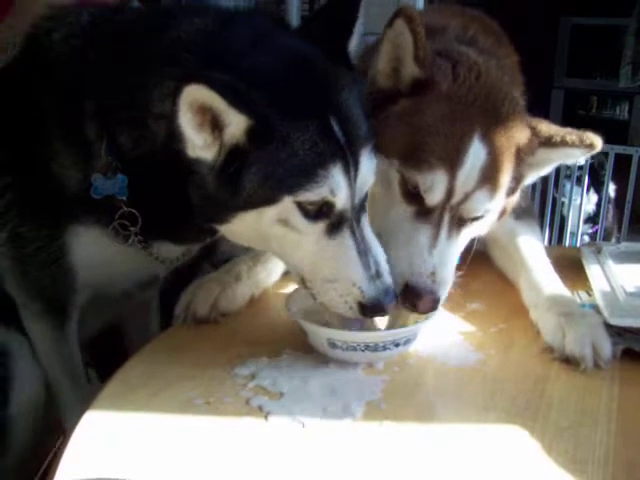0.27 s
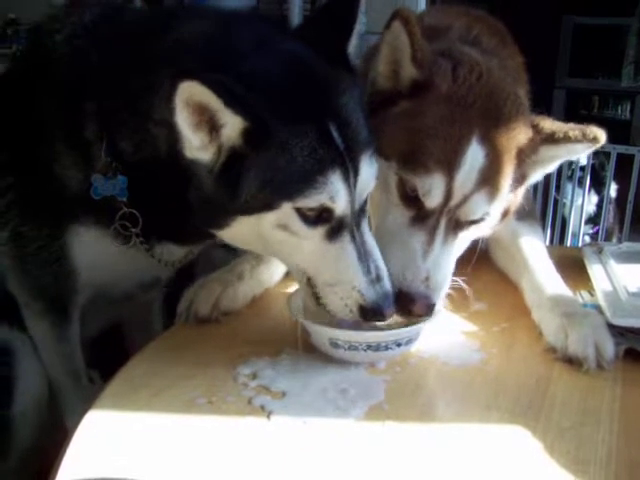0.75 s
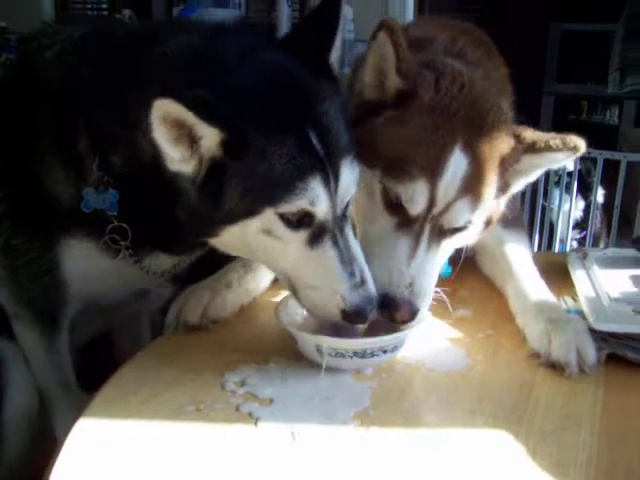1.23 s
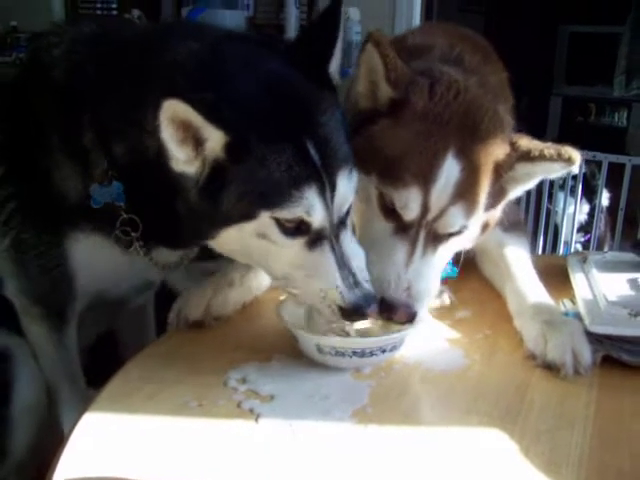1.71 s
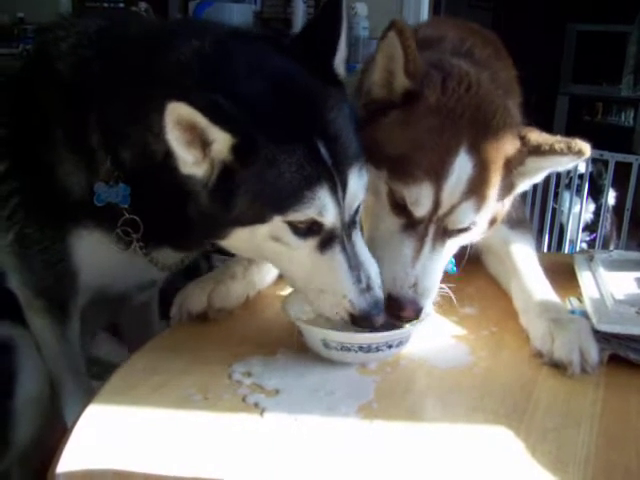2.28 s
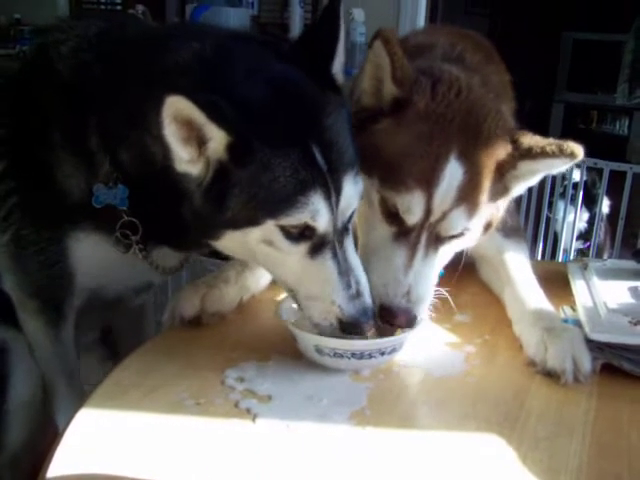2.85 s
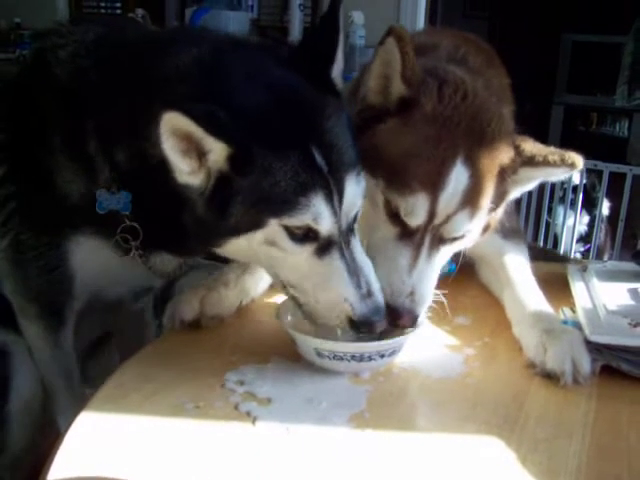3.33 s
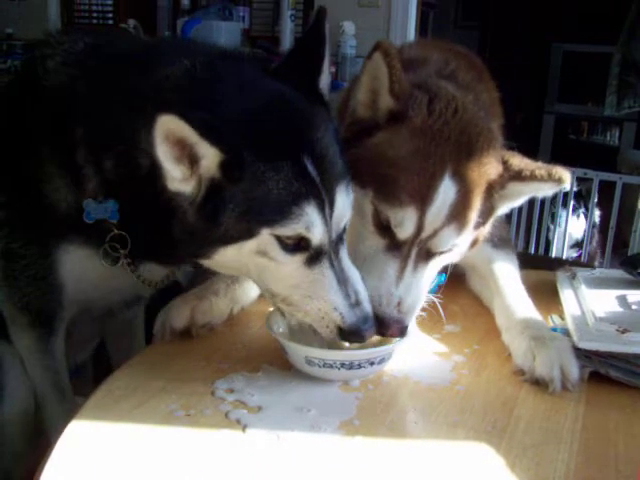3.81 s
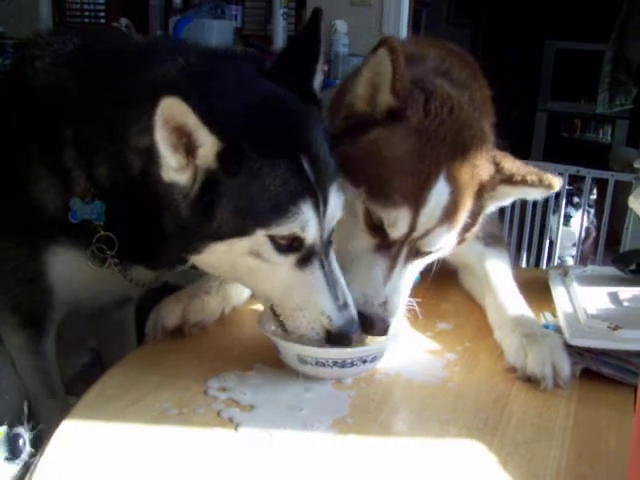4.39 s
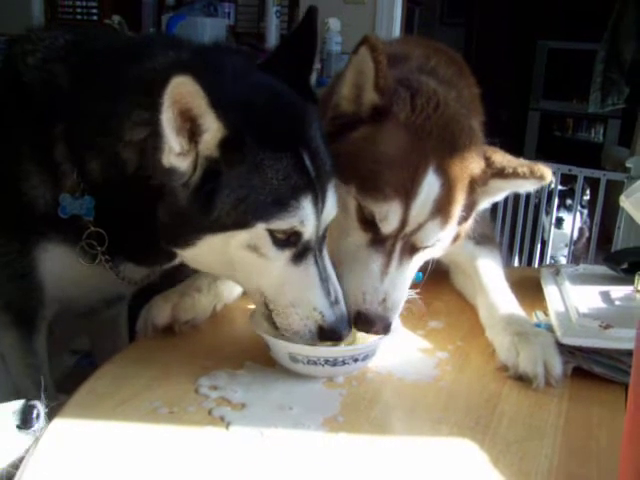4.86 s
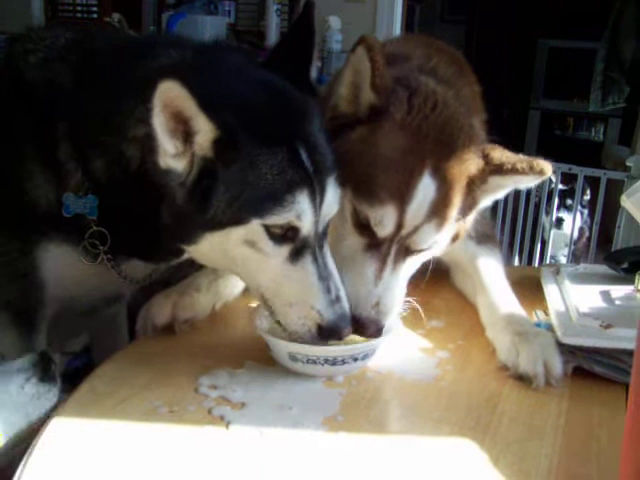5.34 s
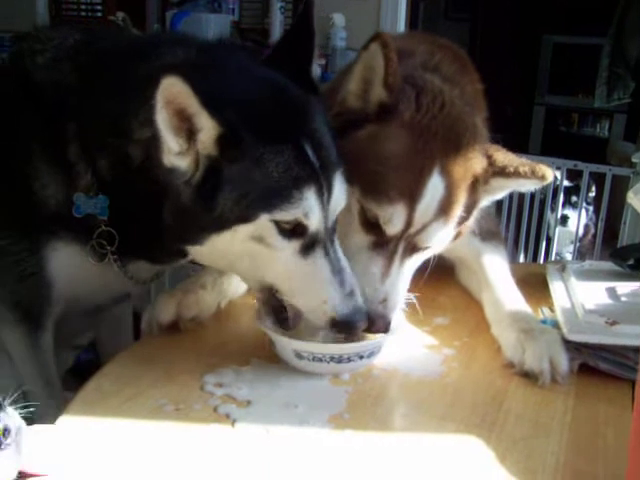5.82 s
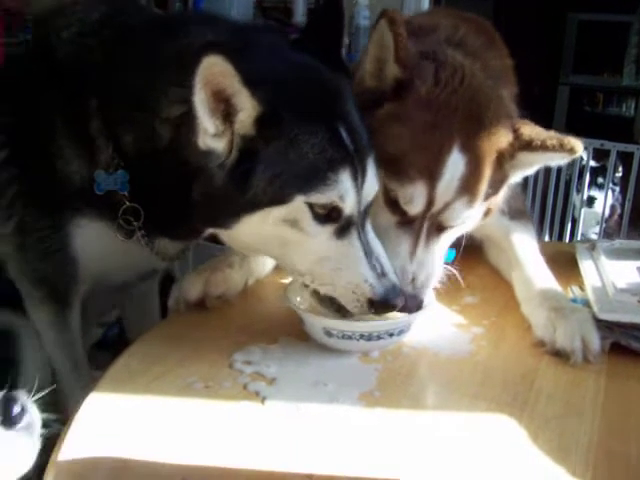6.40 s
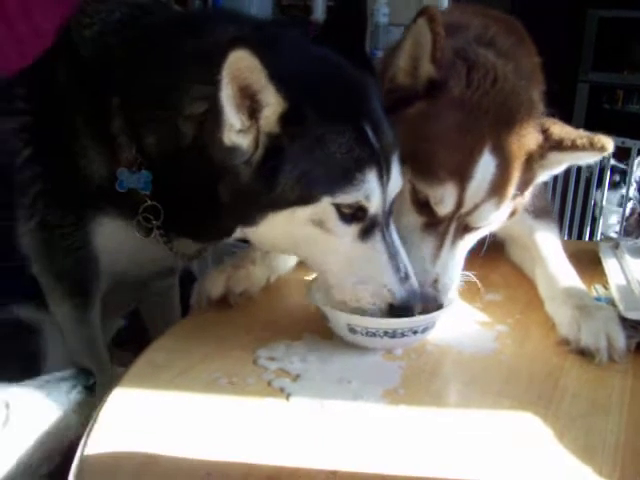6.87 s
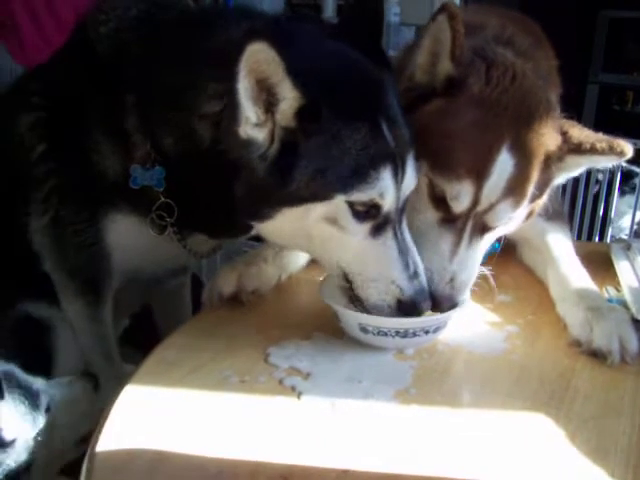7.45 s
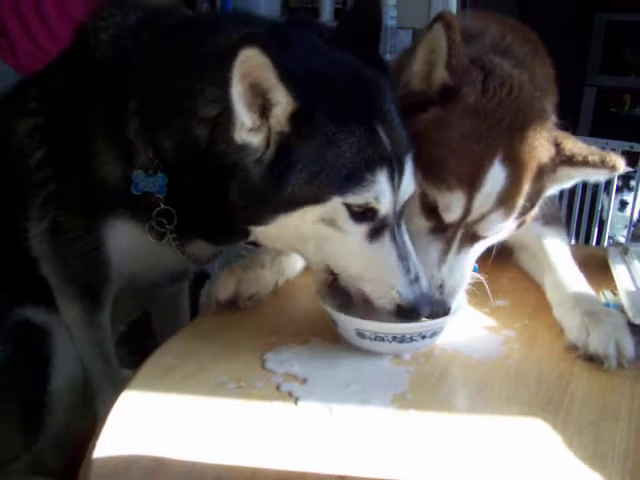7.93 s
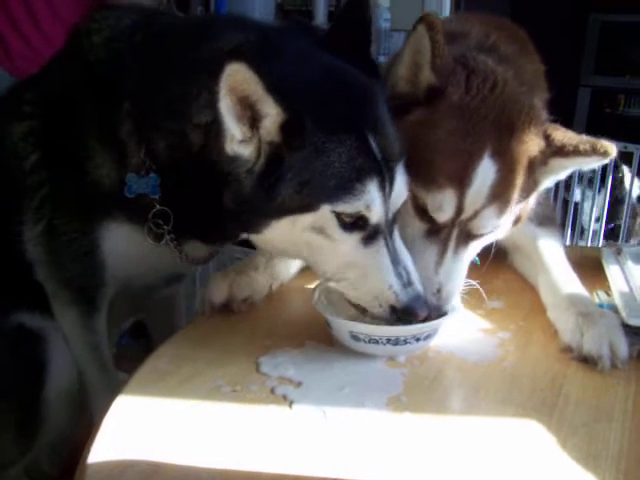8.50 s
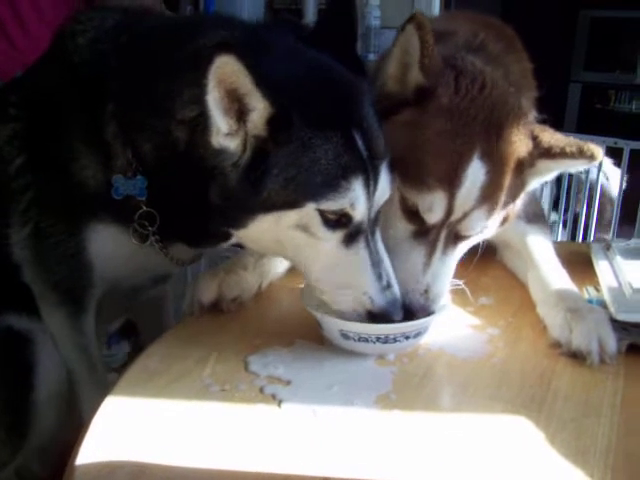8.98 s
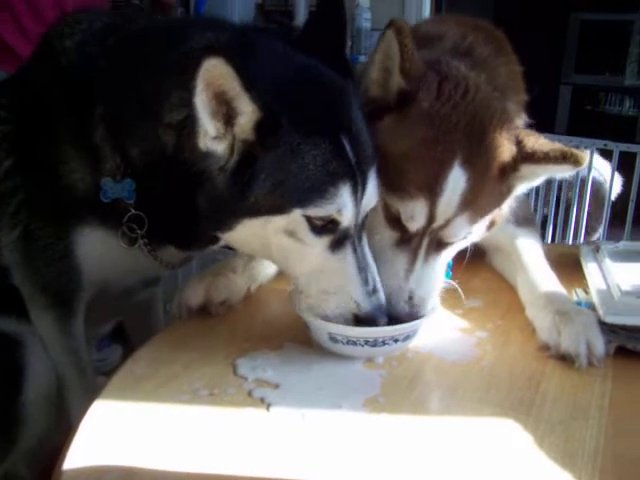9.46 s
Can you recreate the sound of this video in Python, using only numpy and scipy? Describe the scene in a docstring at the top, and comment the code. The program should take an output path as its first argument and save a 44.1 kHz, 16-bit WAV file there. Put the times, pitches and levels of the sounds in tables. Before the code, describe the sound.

Steady, messy lapping already under way and continuing to the end. Overlapping tongues slap liquid, pull it up and peel away with wet clicks, making rounded mid-pitched plops and crisp smacks. Small bubbles chirp upward now and then, low knocks land softly, and one tiny tick touches the bowl after midway. Close, single small microphone in a small room, with faint appliance hum and low background noise beneath.

```python
"""Dogs lapping from a bowl

Two dogs lap from one small bowl on a wooden kitchen table, close to the microphone.
Each lap is a sharp tongue strike and a softer draw after a dip in the idle crackle; licks fall in between.
They drive swarms of tiny ringing cavities: low ones slosh as bubbles, high ones crackle as saliva films.
Single ringing cavities make plops, wet snaps, clear bubbles and dull thuds; one tick rings the bowl.
Decaying noise gives the small room its tail; shaped noise and wavering sines lie underneath as noise and hum."""
import sys
import numpy as np
from scipy import signal
from scipy.fft import rfft, irfft, next_fast_len
from scipy.io import wavfile
from scipy.ndimage import uniform_filter1d

SR = 44100
rng = np.random.default_rng(int(sys.argv[2]) if len(sys.argv) > 2 else 0)


def transcribe(signal):
    """Save signal, clipped to [-1, 1], as a 16-bit WAV file at the path in sys.argv[1]."""
    frames = np.atleast_2d(signal).T
    limited = np.clip(frames, -1, 1)
    pcm = np.round(limited * 32767).astype(np.int16)
    wavfile.write(sys.argv[1], SR, pcm)


N = 428211

# Levels in the event tables are relative; each layer adds its own gain.
# air pockets closing under a tongue: start_s, level_db, pitch_hz
PLOPS = [(0.006, -14.5, 1580.0), (0.116, -12.5, 1130), (0.159, -10.5, 1190), (0.305, -7, 845),
         (0.502, -7, 1070), (0.529, -13, 1250.0), (0.703, -10.5, 1140.0), (1.0045, -2.5, 1260),
         (1.14, -17.5, 1280), (1.367, -12.0, 1300.0), (1.375, -15.5, 1160), (1.412, -10.5, 1080),
         (1.425, -7, 1290), (1.518, -5.0, 877), (1.735, -5.0, 1040), (1.803, -10.5, 850.0),
         (1.843, -9, 1300.0), (2.065, -11, 1310), (2.171, -8.5, 1130), (2.194, -9.5, 1270),
         (2.305, -12, 815), (2.49, -11.5, 1370), (2.556, -9.5, 766), (2.715, -4.5, 1080.0),
         (2.905, -14, 1080), (3.039, -7.5, 1230), (3.134, -10.5, 1300.0), (3.201, -9, 1060),
         (3.5384, -5.5, 1540), (3.579, -11.5, 990), (3.61, -12.5, 1200), (3.656, -13, 1080.0),
         (3.8753, -12.5, 1020), (3.887, -6, 920), (3.96, -10, 1060), (3.984, -13, 1470), (4.025, -11, 1020),
         (4.061, -21, 1300), (4.249, -6.5, 920.0), (4.334, -9, 1270.0), (4.416, -6.5, 980),
         (4.434, -11, 1150), (4.6449, -2.5, 1010), (4.754, -6, 955), (4.807, -9, 1000.0),
         (4.963, -14, 1010), (5.14, -4, 1180), (5.263, -12.5, 890), (5.281, -10.5, 945), (5.313, -10, 960),
         (5.425, -10.5, 840), (5.436, -11, 850), (5.514, -12, 900), (5.664, -12.0, 1010.0),
         (5.684, -5.5, 1240), (5.847, -6.5, 880), (5.864, -10.5, 1130.0), (5.94, -5, 1160),
         (6.081, -8.5, 1000), (6.092, -8.5, 1030.0), (6.155, -15.5, 1480), (6.208, -15.5, 1740),
         (6.427, -5.5, 1030), (6.504, -8, 1350), (6.551, -5, 990), (6.7864, -8, 1060), (6.9199, -2, 1060),
         (6.96, -8, 830), (7.186, -7, 1130), (7.622, -12, 1360), (7.67, -11, 714), (7.8097, -6, 880),
         (7.839, -9, 826), (8.061, -4.5, 1280.0), (8.5204, -5.5, 1070), (8.69, -12.5, 912),
         (8.781, -8.5, 1020.0), (9.013, -13.5, 900), (9.312, -1, 1230), (9.334, -16, 1350),
         (9.462, -8.5, 947)]
# a tongue peeling off the liquid or the palate: start_s, level_db, pitch_hz
SNAPS = [(0.1492, -6.0, 4950), (0.169, -14.5, 3150), (0.523, -8, 5200), (0.71, -12.5, 4200.0),
         (1.012, -11.5, 4230), (1.345, -12.5, 3940), (1.362, -7, 5700), (1.545, -15, 4330),
         (1.616, -10, 3450), (1.635, -13.5, 3460), (1.725, -13, 3620), (1.9095, -13, 3630),
         (2.0857, -10, 4430.0), (2.169, -7.5, 3700), (2.185, -11.5, 4400), (2.559, -6, 4180),
         (3.025, -6, 6030), (3.0468, -12, 4200), (3.133, -17, 3900), (3.219, -10, 3860), (3.4051, -6, 6200),
         (3.445, -15.0, 4250), (3.614, -14.5, 3500.0), (3.872, -10, 6000), (3.882, -11, 3440),
         (3.942, -19, 7200), (4.224, -12.5, 3450), (4.244, -18.5, 5760), (4.346, -15, 4130),
         (4.4, -14, 4500), (4.639, -11.0, 5800.0), (4.756, -10.5, 2850), (4.761, -14, 3000),
         (5.124, -11, 5830), (5.141, -9, 4500.0), (5.318, -10.5, 4000), (5.51, -7.5, 6100),
         (5.691, -15, 4900), (5.775, -24, 5400), (5.816, -9.5, 3040), (5.94, -8, 4780), (6.117, -18, 5900),
         (6.312, -23, 6650), (6.42, -9, 4080), (6.429, -13.0, 4900), (6.784, -10.5, 6130),
         (6.793, -17, 3950), (6.959, -14.5, 4100), (6.976, -12.5, 4100), (7.187, -11, 4370),
         (7.223, -17, 4230), (7.667, -8, 3760), (8.207, -11, 3700.0), (8.513, -9.5, 6400.0)]
# laps, a strike and then a draw: strike_s, draw_delay_s, strike_slosh_db, strike_crackle_db,
# draw_slosh_db, draw_crackle_db, crackle_top_db (upper part of the crackle)
LAPS = [(0.157, 0.22, -29.5, -20, -27.5, -23.5, -12.0), (0.522, 0.097, -41.5, -24, -38, -26, -14),
        (0.693, 0.096, -27, -24.5, -26, -29, -5.5), (0.997, 0.13, -29.5, -24, -25.5, -26.5, -3),
        (1.359, 0.037, -25, -33, -25.5, -19.5, -9), (1.725, 0.12, -26.5, -21.5, -25, -24.5, -8),
        (2.052, 0.12, -24, -21.5, -29, -22, -10.5), (2.557, 0.18, -23, -31, -36, -26, -6),
        (3.026, 0.18, -30.5, -29, -28, -27.5, -9.5), (3.406, 0.22, -28.0, -18.0, -26.5, -22, -11.5),
        (3.871, 0.11, -34.5, -22.5, -25.5, -22.5, -11), (4.232, 0.16, -35, -18, -28, -24.5, -11),
        (4.643, 0.1, -28.0, -20.0, -25.5, -27, -8.5), (5.123, 0.18, -33.5, -23.5, -31.5, -32, -7.5),
        (5.506, 0.192, -33, -27.5, -33.5, -31, -4.5), (5.932, 0.262, -26, -31.5, -33, -26.5, -20),
        (6.42, 0.11, -28, -21.5, -27.5, -24.5, -9), (6.785, 0.17, -39.5, -26, -24, -25.0, -7.5),
        (7.185, 0.15, -26, -23.5, -26, -23.0, -10), (7.649, 0.19, -19, -21.5, -33.5, -24.5, -4),
        (8.041, 0.056, -28, -29, -31, -21, -4), (8.514, 0.23, -27, -22.5, -32.5, -28.5, -10.5),
        (9.307, 0.13, -28, -21.5, -43, -33.5, -7.5)]
# softer licks between the laps: start_s, length_s, slosh_db, crackle_db, crackle_top_db
LICKS = [(0.004, 0.007, -25.5, -26.0, -4.5), (0.099, 0.022, -28, -26, -8.5), (0.297, 0.046, -33, -31, -9),
         (0.46, 0.036, -32.5, -26, -3), (0.828, 0.03, -52, -26.5, -23), (1.177, 0.062, -43.5, -26.0, -12),
         (1.472, 0.061, -28, -26.5, -8), (1.662, 0.12, -35, -24.5, -16), (1.893, 0.18, -34, -25.5, -15.5),
         (2.336, 0.0099, -28, -27.0, -5.5), (2.472, 0.065, -30.5, -27.5, -11),
         (2.785, 0.029, -30.5, -30.5, -12), (2.876, 0.029, -25.5, -25.5, -11),
         (3.135, 0.01, -34.5, -31.5, -10.5), (3.262, 0.013, -35.5, -28, -13.0),
         (3.344, 0.045, -48.5, -34, -8), (3.766, 0.038, -55, -39.5, 1), (4.057, 0.057, -38, -30.5, -8),
         (4.502, 0.016, -39.5, -33, -19), (4.83, 0.043, -35.5, -25, -11.5), (5.076, 0.017, -27.5, -25, -9),
         (5.405, 0.071, -28, -25.5, -15), (5.57, 0.02, -41.5, -31.5, -7), (5.833, 0.053, -33.5, -27.5, -17),
         (6.044, 0.06, -37, -41.5, 6), (6.593, 0.0046, -28.5, -30.5, -10.5), (6.663, 0.02, -49.5, -40, -1),
         (7.274, 0.02, -28.5, -35, -12), (7.545, 0.087, -36.5, -28, -8.5),
         (7.917, 0.11, -43.5, -28.5, -5.5), (8.221, 0.011, -33.5, -22.5, -22),
         (8.375, 0.1, -32.5, -28, -14), (8.644, 0.091, -30.5, -32.5, -11), (8.752, 0.075, -33, -29.5, -12),
         (8.916, 0.076, -40, -35.5, -7.5), (9.033, 0.052, -35, -34.5, -5.5),
         (9.204, 0.057, -30.5, -27, -13.5), (9.387, 0.015, -45.5, -30.5, -16),
         (9.485, 0.0076, -36, -29, -5.5), (9.591, 0.019, -32, -24.5, -14.5),
         (9.647, 0.012, -44.5, -36, -24)]

# a strike starts almost at once and dies away; a draw swells and sinks
STRIKE_RISE_DB_PER_S, STRIKE_FALL_DB_PER_S = 2002, 154
DRAW_RISE_DB_PER_S, DRAW_FALL_DB_PER_S = 125.5, 190
LICK_RISE_DB_PER_S, LICK_FALL_DB_PER_S = 224.5, 260
# every plop leaves a brief slosh behind, every snap a brief crackle
PLOP_WAKE_DB, SNAP_WAKE_DB, WAKE_FALL_DB_PER_S = -17.5, -13.5, 474
# liquid and wet lips are never quite still
REST_SLOSH_DB, REST_TOP_DB = -53.5, -10
# open jaws let out the slosh's upper resonance: upper against lower part, by movement
STRIKE_GAPE_DB, DRAW_GAPE_DB, LICK_GAPE_DB, WAKE_GAPE_DB = 1.5, -4, -1, -14.5
# wider jaws also make higher plops: upper gain per octave of plop pitch
GAPE_DB_PER_OCTAVE, MID_PLOP_HZ = 11.5, 1080
# the mouth falls quiet while the tongue reaches out for the next strike
REACH_S, REACH_HUSH_DB = .045, 15.5


def from_db(db):
    """Decibels to gain."""
    return 10 ** (np.asarray(db) / 20)


def rms_one(x):
    """Scale to an rms of 1."""
    return x / np.sqrt(np.mean(x ** 2) + 1e-20)


def at_hz(points, hz):
    """Read a table on a log-frequency axis."""
    freqs, values = np.transpose(points)
    return np.interp(np.log(np.maximum(hz, 1)), np.log(freqs), values)


def coloured(x, spectrum):
    """Filter with a smooth gain curve that falls away below its first point; rms 1."""
    size = next_fast_len(N)
    hz = np.arange(size // 2 + 1) * SR / size
    gain = from_db(at_hz(spectrum, hz)) * np.minimum(hz / spectrum[0][0], 1) ** 2
    return rms_one(irfft(rfft(x, size) * gain, size)[:N])


def brightened(x, hz, top_db):
    """Raise or lower everything above hz by a level that moves in time."""
    size = next_fast_len(N)
    freqs = np.arange(size // 2 + 1) * SR / size
    low = irfft(rfft(x, size) / (1 + (freqs / hz) ** 12), size)[:N]
    return low + from_db(top_db) * (x - low)


def drift(rate):
    """Random wander through `rate` points a second, joined by lines; rms 1."""
    knots = rng.standard_normal(4096)
    return rms_one(np.interp(np.arange(N) / SR * rate, np.arange(len(knots)), knots))


def add(out, s, sound):
    """Mix a sound in at time s."""
    start = int(np.clip(round(s * SR), 0, N - 1))
    out[start:start + len(sound)] += sound[:N - start]


def background():
    """Soft room noise with an appliance hum that wavers in level and phase."""
    # colour of the room noise: freq_hz, gain_db
    noise_colour = [(25, -10), (52, -6), (70, -10.5), (110, -6), (185, 2), (300, -4), (500, -5),
                    (1000, -37.5), (3000, -8.5), (8000, -26.5)]
    # appliance hum, level before its wavering: freq_hz, rms_db
    hum_tones = [(52, -59.5), (182, -50.5)]
    t = np.arange(N) / SR
    hum = np.zeros(N)
    for hz, db in hum_tones:
        level = np.sqrt(2) * from_db(db + 3.8 * drift(14))
        hum += level * np.sin(2 * np.pi * hz * t + 1.3 * drift(12))
    noise = coloured(rng.standard_normal(N), noise_colour)
    return hum + from_db(-39) * noise


def cavity(hz, cycles, rise):
    """A small air pocket loses 60 dB in `cycles` as it shrinks and its pitch rises by a share; peak 1."""
    turns = np.arange(int(2 * cycles * SR / hz) + 2) * hz / SR
    envelope = (1 - np.exp(-(2 * turns) ** 2)) * from_db(-60 * turns / cycles)
    wave = envelope * np.sin(2 * np.pi * turns * (1 + rise * turns / cycles / 2))
    return wave / (np.abs(wave).max() + 1e-9)


def grains(per_s, low_hz, high_hz, cycles, rise, spread_db, mouth_db, favoured, even_s, count):
    """A swarm of tiny cavities of random size and pitch, evened to a steady level."""
    born = np.flatnonzero(rng.random(N) < per_s / SR)
    strengths = from_db(spread_db * np.minimum(rng.exponential(1, N), 4))
    sizes = (strengths * rng.choice([-1, 1], N))[born]
    dealt = rng.integers(0, count, N)[born]
    pitches = np.geomspace(low_hz, high_hz, count)
    # the mouth favours its own pitch and the octaves of it, and these slide up and down
    octaves_off = np.log2(pitches[dealt] / favoured[born])
    sizes = sizes * from_db(mouth_db * np.cos(2 * np.pi * octaves_off))
    out = np.zeros(N + SR)
    for k, hz in enumerate(pitches):
        pop = cavity(hz, cycles, rise)
        chosen = dealt == k
        places = born[chosen, None] + np.arange(len(pop))
        np.add.at(out, places, sizes[chosen, None] * pop * hz / low_hz)
    power = uniform_filter1d(out[:N] ** 2, max(int(even_s * SR), 2))
    return out[:N] / np.sqrt(np.abs(power) + power.mean() / 100)


def pitch_of(rows):
    """The pitch of the mouth's cavity (Hz), gliding from one pop to the next."""
    s, _, hz = np.transpose(rows)
    return np.interp(np.arange(N) / SR, s, hz)


def mouth(rows, wander, rate):
    """The pitch that the mouth favours (Hz): that of its pops, wandering by a share of an octave."""
    return pitch_of(rows) * 2 ** (wander * drift(rate))


def jaw_opening():
    """How much of the upper resonance the jaws let out (dB); it goes with the pitch of the plops."""
    return GAPE_DB_PER_OCTAVE * np.log2(pitch_of(PLOPS) / MID_PLOP_HZ)


def lick(s, length, db, tone_db):
    """A tongue wipes along the bowl or the lips."""
    return s, LICK_RISE_DB_PER_S, length, LICK_FALL_DB_PER_S, db, tone_db


def wake(s, db, tone_db):
    """Liquid settles after a plop or snap."""
    return s, STRIKE_RISE_DB_PER_S, 0, WAKE_FALL_DB_PER_S, db, tone_db


def strike(s, db, tone_db):
    """The tongue hits the liquid."""
    return s, STRIKE_RISE_DB_PER_S, 0, STRIKE_FALL_DB_PER_S, db, tone_db


def draw(s, db, tone_db):
    """The tongue pulls liquid up and the jaws close on it."""
    return s, DRAW_RISE_DB_PER_S, 0, DRAW_FALL_DB_PER_S, db, tone_db


def movements(rows, rest_db, rest_tone_db):
    """Sum the power of overlapping movements over a resting level; give level and tone (dB)."""
    # rows: start_s, rise_db_per_s, hold_s, fall_db_per_s, level_db, tone_db
    s, rise, hold, fall, db, tone_db = np.transpose(rows)[:, :, None]
    coarse_t = np.arange(0, N / SR, .001)
    before = np.maximum(s - coarse_t, 0)
    after = np.maximum(coarse_t - s - hold, 0)
    power = from_db(db - rise * before - fall * after) ** 2
    upper_power = power * from_db(tone_db) ** 2
    t = np.arange(N) / SR
    total = np.interp(t, coarse_t, power.sum(axis=0)) + from_db(rest_db) ** 2
    upper = np.interp(t, coarse_t, upper_power.sum(axis=0)) + from_db(rest_db + rest_tone_db) ** 2
    return 10 * np.log10(total), 10 * np.log10(upper / total)


def stirring():
    """How hard the tongues stir the liquid, and the gape of the jaws (dB)."""
    rows = [lick(s, length, db, LICK_GAPE_DB) for s, length, db, _, _ in LICKS]
    rows += [wake(s, db + PLOP_WAKE_DB, WAKE_GAPE_DB) for s, db, _ in PLOPS]
    for s, delay, strike_db, _, draw_db, _, _ in LAPS:
        rows += [strike(s, strike_db, STRIKE_GAPE_DB), draw(s + delay, draw_db, DRAW_GAPE_DB)]
    return movements(rows, REST_SLOSH_DB, LICK_GAPE_DB)


def slosh():
    """Stirred liquid: clumps of bubbles, more of them the harder it is stirred."""
    # colour of the bubbles: freq_hz, gain_db
    bubble_colour = [(120, -33), (300, -6), (500, -7.5), (600, 1.5), (800, 5), (1120, 3.5), (1400, -1),
                     (1850, 0.5), (2300, -9), (3500, -21.5)]
    level_db, gape_db = stirring()
    per_s = 1000 * from_db(.4 * (level_db + 30.5))
    favoured = mouth(PLOPS, wander=0.32, rate=25)
    bubbles = grains(per_s, low_hz=284, high_hz=2697, cycles=19, rise=0.3, spread_db=5.5,
                     mouth_db=4.5, favoured=favoured, even_s=0.013, count=36)
    bubbles = coloured(bubbles, bubble_colour)
    return from_db(level_db + 1.1) * brightened(bubbles, 1360, gape_db + 0.92 * jaw_opening())


def idling(gain_db):
    """Level of the idle crackle of wet lips (dB), hushed just before each strike."""
    # idle crackle before the gain: time_s, level_db
    idle_level = [(0.0, -30.5), (0.59, -23.5), (0.78, -33), (1.75, -29), (3.16, -30.5), (5.92, -34),
                  (7.02, -32.5), (7.92, -25.5), (8.56, -35.5), (9.7, -34)]
    t = np.arange(N) / SR
    reaching = sum(np.exp(-((t - s + REACH_S) / REACH_S) ** 2) for s, *_ in LAPS)
    return np.interp(t, *np.transpose(idle_level)) + gain_db - REACH_HUSH_DB * reaching


def smacking(strike_top_db):
    """How hard the wet tongues smack, and how brightly the films tear (dB)."""
    rows = [lick(s, length, db, top_db) for s, length, _, db, top_db in LICKS]
    rows += [wake(s, db + SNAP_WAKE_DB, REST_TOP_DB) for s, db, _ in SNAPS]
    for s, delay, _, strike_db, _, draw_db, top_db in LAPS:
        rows += [strike(s, strike_db, top_db + strike_top_db), draw(s + delay, draw_db, top_db)]
    return movements(rows, idling(gain_db=-5.0), REST_TOP_DB)


def smack():
    """Saliva films tear in a dense, clumpy crackle."""
    # colour of the crackle: freq_hz, gain_db
    crackle_colour = [(900, -22), (1800, -11), (2500, -5.5), (3200, -2), (3900, 1), (4600, 1), (5600, -1.5),
                      (6700, -2.5), (8000, -8)]
    level_db, top_db = smacking(strike_top_db=-1.0)
    per_s = 1500 * from_db(3.5 * drift(80) + .5 * (level_db + 34.5))
    favoured = mouth(SNAPS, wander=0.31, rate=20)
    crackle = grains(per_s, low_hz=1300, high_hz=7450, cycles=19, rise=0.038, spread_db=2.5,
                     mouth_db=2.5, favoured=favoured, even_s=0.081, count=48)
    return from_db(level_db + 1.0) * brightened(coloured(crackle, crackle_colour), 4365, top_db)


def pops(rows, gain_db, cycles, rise, splash_db, splash_s, scatter, count):
    """Each row is one cavity closing, with a short splash of smaller ones near its pitch."""
    out = np.zeros(N)
    for s, db, hz in rows:
        # every cavity has its own damping and its own upward glide
        length = np.exp(0.17 * rng.standard_normal())
        glide = rise * rng.uniform(0, 3.0)
        main = cavity(hz, cycles * length, glide)
        add(out, s, rng.choice([-1, 1]) * from_db(db + gain_db) * main)
        waits = (np.arange(count) + rng.random(count)) / count
        detunes = rng.permutation(np.linspace(-1, 1, count))
        signs = rng.choice([-1, 1], count)
        for wait, detune, sign in zip(waits, detunes, signs):
            drop = cavity(hz * np.exp(scatter * detune), cycles, glide)
            add(out, s + splash_s * wait, sign * from_db(db + splash_db) * np.exp(-wait) * drop)
    return out


def plops():
    """Air pockets close under the tongue and ring; closed jaws round the sound."""
    ringing = pops(PLOPS, gain_db=-2.0, cycles=11.0, rise=0.16,
                   splash_db=-12.0, splash_s=.009, scatter=0.3, count=4)
    return brightened(ringing, 1600, jaw_opening() + 0.52)


def snaps():
    """A tongue peels off the liquid or palate: short, high-pitched cavity rings."""
    return pops(SNAPS, gain_db=4.0, cycles=23.3, rise=0.3,
                splash_db=-13.5, splash_s=0.0088, scatter=0.43, count=8)


def clear_bubbles(gain_db):
    """Lone bubbles near the surface sing, most of them gliding upwards."""
    # bubbles: start_s, level_db (before the gain), start_pitch_hz, ring_cycles,
    # pitch_rise_share (below 0 plays as steady)
    lone_bubbles = [(.318, -20, 850, 16, .3), (.4495, -18.5, 627, 29, -4), (3.5377, -17, 1630, 24, 4.5),
                    (4.9875, -20, 1540, 46, 3.7), (7.215, -25.5, 1150, 18, -1), (7.246, -29, 660, 16, 0),
                    (7.791, -19, 720, 14, .2), (8.3754, -19.5, 1730, 59, 0.7), (8.411, -24, 1690, 28, 4),
                    (8.461, -23, 1390, 25, 3), (8.821, -21, 1705, 99, 2), (9.045, -22, 950, 20, .3),
                    (9.187, -20, 1680, 44, -0.1), (9.255, -23, 1500, 35, .7), (9.472, -21, 1020, 18, .25)]
    out = np.zeros(N)
    for s, db, hz, cycles, rise in lone_bubbles:
        add(out, s, from_db(db + gain_db) * cavity(hz, cycles, max(rise, 0)))
    return out


def thuds():
    """Jaws and bowl knock dully: low, short rings with a faint scatter behind."""
    # thuds: start_s, level_db (before the gain), pitch_hz
    knocks = [(.7077, -15, 420), (1.511, -23, 230), (2.5539, -16, 320), (3.167, -27, 215),
              (3.5006, -17, 252), (3.514, -17.5, 161), (3.522, -19.5, 353), (3.5366, -16.5, 211),
              (3.88, -19, 440), (5.1382, -18, 355), (5.266, -23, 230), (5.8393, -20, 230), (6.56, -24, 250),
              (7.128, -25, 183), (7.625, -26, 290), (8.065, -25, 250), (8.168, -23, 236),
              (8.4921, -9.5, 232), (8.503, -17.5, 260), (8.782, -21, 360), (9.029, -20, 230),
              (9.425, -18, 440)]
    return pops(knocks, gain_db=-1.0, cycles=9, rise=0.044,
                splash_db=-17, splash_s=0.009, scatter=0.45, count=3)


def bowl():
    """A tooth's tick sets the bowl's modes ringing; the liquid damps them quickly."""
    # a tooth ticks against the bowl: start_s, level_db
    ticks = [(6.039, -23)]
    # modes of the bowl: freq_hz, level_db (against the tick), t60_s
    modes = [(3250, -11, 0.18), (4830, 4.5, 0.043)]
    out = np.zeros(N)
    for s, db in ticks:
        for hz, mode_db, t60 in modes:
            add(out, s, from_db(db + mode_db) * cavity(hz, t60 * hz, 0))
    return out


def room_tail():
    """A diffuse tail of noise that dies band by band; energy 1."""
    # ring time of the kitchen: freq_hz, t60_s
    kitchen_t60 = [(150, 0.17), (1000, 0.18), (4000, 0.32), (8000, 0.1)]
    t = np.arange(SR // 2) / SR
    edges = np.geomspace(90, 11000, num=8)
    tail = 0
    for low, high in zip(edges, edges[1:]):
        bandpass = signal.butter(2, [low, high], "band", fs=SR, output="sos")
        band = signal.sosfilt(bandpass, rng.standard_normal(len(t)))
        t60 = at_hz(kitchen_t60, np.sqrt(low * high))
        tail = tail + band * np.exp(-np.log(1000) * t / t60)
    tail = tail * (1 - np.exp(-t / 0.00017))
    return tail / np.sqrt(np.sum(tail ** 2))


def kitchen(x, tail_db):
    """Reflections from table and walls: two tails trade places as the heads move."""
    pose = np.pi * drift(3)
    tail = np.zeros(N)
    for share in (np.cos(pose), np.sin(pose)):
        tail += signal.fftconvolve(x * share, room_tail())[:N]
    return x + from_db(tail_db) * tail


def scene():
    """Plops, snaps and thuds stand out of the slosh and crackle, all in one room over its background."""
    lapping = slosh() + smack() + plops() + snaps() + clear_bubbles(gain_db=5.5) + thuds() + bowl()
    return (kitchen(lapping, tail_db=-9.5) + background())[None, :]


def record(dry):
    """A small microphone: the treble rolls off, the tallest peaks are rounded, the top is cut steeply."""
    treble_rolloff = signal.butter(4, 7400, fs=SR, output="sos")
    soft = signal.sosfilt(treble_rolloff, dry)
    rounded = soft / (1 + (soft / .72) ** 6) ** (1 / 6)  # peaks bend towards .72
    steep_cut = signal.ellip(8, .3, 70, 8400, fs=SR, output="sos")
    return signal.sosfilt(steep_cut, rounded)


dry = scene()
out = record(dry)
transcribe(out)
```